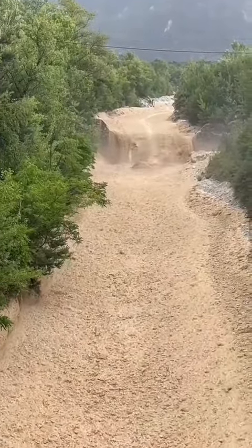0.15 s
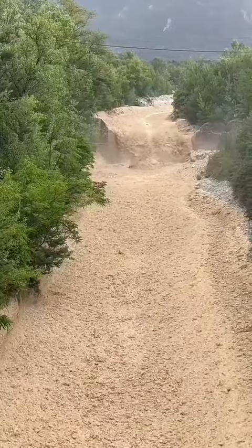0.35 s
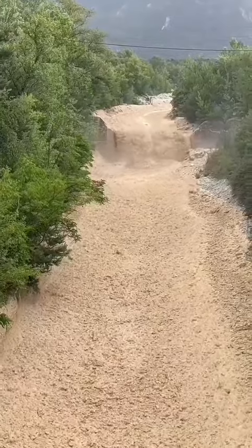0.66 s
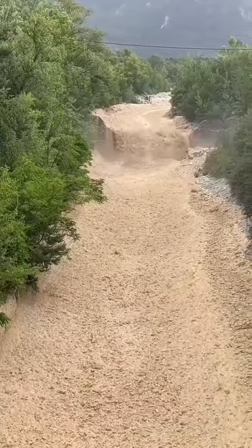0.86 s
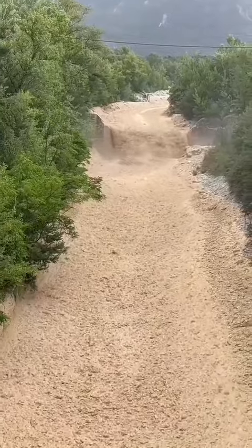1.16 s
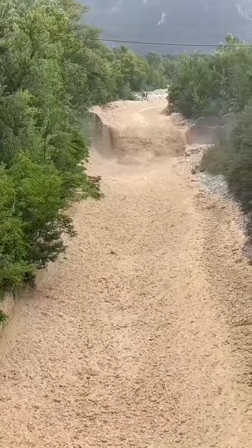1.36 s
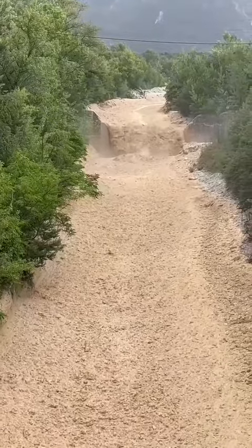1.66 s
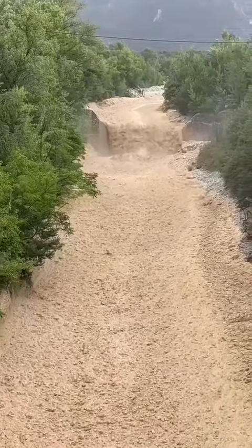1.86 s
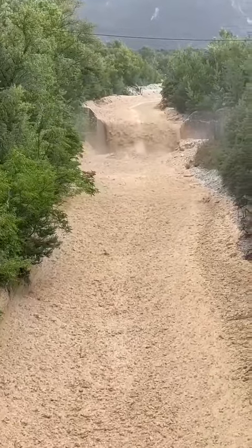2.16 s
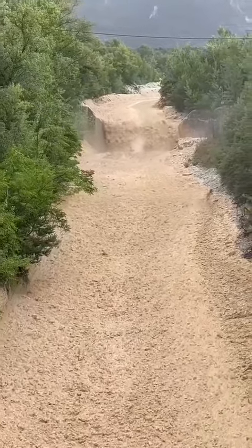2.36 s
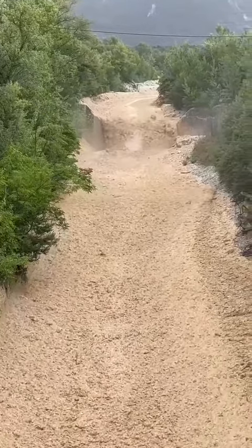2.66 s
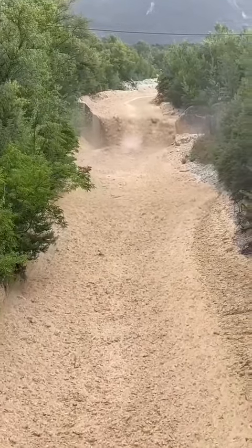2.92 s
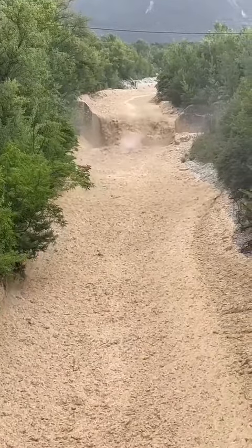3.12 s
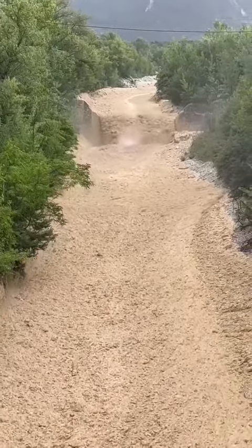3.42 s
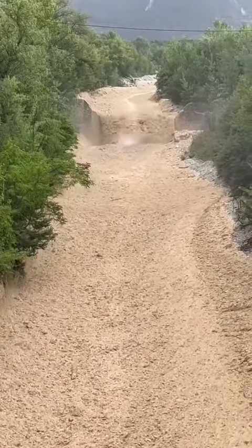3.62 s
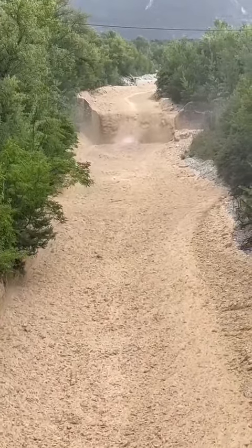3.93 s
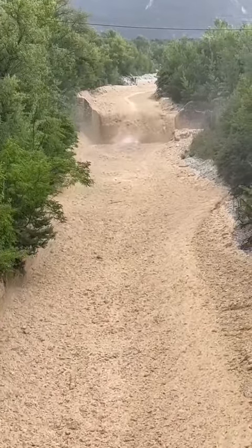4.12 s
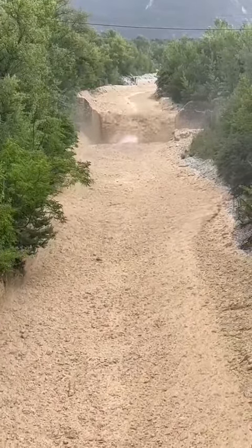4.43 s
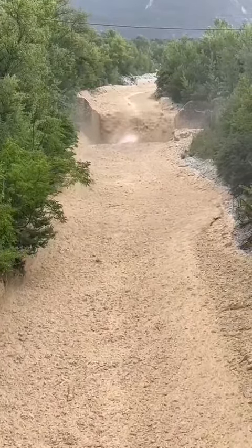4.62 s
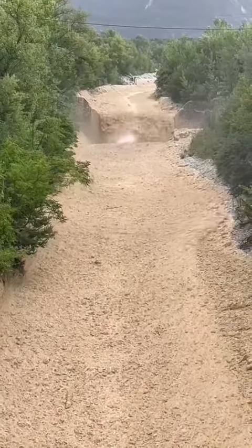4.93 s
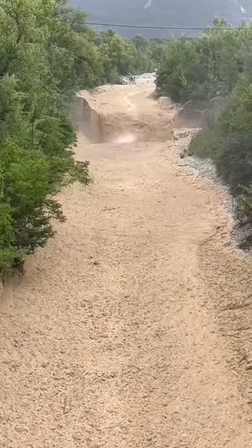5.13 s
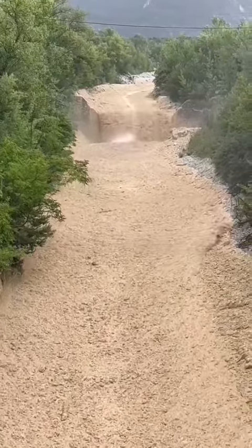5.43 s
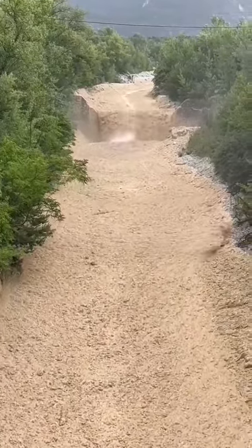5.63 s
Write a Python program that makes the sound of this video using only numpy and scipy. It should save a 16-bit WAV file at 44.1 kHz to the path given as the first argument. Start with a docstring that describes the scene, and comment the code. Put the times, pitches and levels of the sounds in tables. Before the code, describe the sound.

A heavy, dark flood rush holds nearly constant for six seconds, its bass fluttering as boulders grind beneath slurry. Gurgles and a quiet spray hiss ride on top. Around four seconds, a low knock lands with wind buffeting the microphone. Then mud slaps the near bank, droplets patter, and stones roll past with a rising rumble just after five seconds. Open air, no obvious reverberation.

```python
"""A low rumble and churn under wash and hiss: mud pours over a weir and down a mountain channel.
Filtered noise makes bed rumble, slurry and spray; ringing grains make cobbles, plops and patter.
A swell lifts the surface and brings in the near bank, with slaps (noise and rising sines) and splashes.
One dry tick (a decaying step), wind puffs (band noise), boulder thumps (short sines) and a
rolling mass of stones (a noisy tone climbing in pitch) come on top."""
import sys
import numpy as np
from scipy import signal
from scipy.fft import rfft, irfft, next_fast_len
from scipy.io import wavfile
from scipy.ndimage import uniform_filter1d

SR = 44100
rng = np.random.default_rng(int(sys.argv[2]) if len(sys.argv) > 2 else 0)


def log_audio(samples):
    """Write samples as a 16-bit WAV file to the path given in sys.argv[1]."""
    # one column per channel
    frames = np.atleast_2d(samples).T
    # limit to full scale, then quantise
    limited = np.clip(frames, -1, 1)
    pcm = np.round(limited * 32767).astype(np.int16)
    wavfile.write(sys.argv[1], SR, pcm)


N = 254898
TIME = np.arange(N) / SR


def from_db(db):
    """Decibels to amplitude gain."""
    return 10 ** (np.asarray(db) / 20)


def rms_one(x):
    """Scale so that the mean of the channels has rms 1."""
    mid = np.atleast_2d(x).mean(axis=0)
    return x / np.sqrt(np.mean(mid ** 2) + 1e-20)


def in_time(rows):
    """Interpolate each column of a t/s curve at every sample."""
    s, *columns = np.transpose(rows)
    return [np.interp(TIME, s, column) for column in columns]


def at_hz(points, hz):
    """Read a spectrum on a log-frequency axis."""
    known_hz, values = np.transpose(points)
    return np.interp(np.log(np.maximum(hz, 1)), np.log(known_hz), values)


def drift(rate_hz):
    """Two-pole low-passed noise of rms 1, changing about rate_hz times a second."""
    step = 40  # computed at SR / step, then interpolated
    settle = 2000
    r = np.exp(-2 * np.pi * rate_hz * step / SR)
    noise = rng.standard_normal(N // step + 2 + settle)
    slow = signal.lfilter([1], [1, -2 * r, r * r], noise)[settle:]
    return np.interp(np.arange(N) / step, np.arange(len(slow)), rms_one(slow))


def ring(clicks, hz, cycles):
    """Two-pole resonator: a unit click rings as a sine of height 1, down 60 dB after the given cycles."""
    w = 2 * np.pi * hz / SR
    r = np.exp(-np.log(1000) * hz / (cycles * SR))
    return signal.lfilter([0, np.sin(w)], [1, -2 * r * np.cos(w), r * r], clicks + 1e-18)


def burst(start_s, length_s):
    """Envelope that rises to 1 at half of length_s, then dies away."""
    age = np.maximum(TIME - start_s, 0) / (length_s / 2)
    return age * np.exp(1 - np.minimum(age, 50))


# stereo width: f/Hz, side minus mid/dB
WIDTH = [(60, -68), (110, -84), (200, -43), (300, -16), (420, -15), (620, -10.5), (1300, -9), (2400, -13.5),
         (4400, -9.5), (6500, -6), (8500, -2), (15000, 0.5)]


def coloured(pair, spectrum):
    """Filter two unrelated signals, as mid and side, into stereo: narrow bass, wide treble."""
    size = next_fast_len(N)
    hz = np.arange(size // 2 + 1) * SR / size
    mid, side = rfft(pair, size) * from_db(at_hz(spectrum, hz))
    side = side * from_db(at_hz(WIDTH, hz))
    return rms_one(irfft(np.array([mid + side, mid - side]), size)[:, :N])


def turbulence(spectrum, flutter_db, flutter_hz):
    """Countless small eddies and collisions merge into an irregularly fluttering noise."""
    flutter = from_db(flutter_db * drift(flutter_hz))
    return coloured(rng.standard_normal((2, N)) * flutter, spectrum)


def steady(x, window_s):
    """A broad flow keeps its strength: divide by the moving rms to even out slow swings."""
    power = uniform_filter1d(x.mean(axis=0) ** 2, max(int(window_s * SR), 2))
    return x / np.sqrt(np.maximum(power, 1e-6))


def grains(per_s, low_hz, high_hz, cycles, spread_db, clump_db, count=24):
    """Clumps of small impacts, dealt at random to count resonant pitches; two signals of unrelated sign."""
    chance = per_s * from_db(clump_db * drift(9)) / SR
    born = np.flatnonzero(rng.random(N) < chance)
    sizes = from_db(spread_db * np.minimum(rng.exponential(1, len(born)), 4))
    signs = rng.choice([-1, 1], (2, len(born)))
    dealt = rng.integers(0, count, len(born))
    out = np.zeros((2, N))
    for k, hz in enumerate(np.geomspace(low_hz, high_hz, count)):
        clicks = np.zeros((2, N))
        clicks[:, born] = signs * sizes * (dealt == k)
        out += np.sqrt(hz) * ring(clicks, hz, cycles)
    return out


def patchy(pair, low_hz, high_hz, patch_db, patch_hz, count=10):
    """Eddies of different sizes come and go: each of count log-spaced bands swells on its own."""
    size = next_fast_len(N)
    hz = np.maximum(np.arange(size // 2 + 1) * SR / size, 1)
    register = np.clip(np.log(hz / low_hz) / np.log(high_hz / low_hz), 0, 1) * (count - 1)
    whole = rfft(pair, size)
    out = 0
    for k in range(count):
        weight = np.maximum(1 - abs(register - k), 0)
        band = irfft(whole * weight, size)[:, :N]
        out = out + band * from_db(patch_db * drift(patch_hz))
    return rms_one(out)


# boulders grinding along the bed: t/s, deepest rumble level/dB, upper rumble level/dB
RUMBLE_LEVEL = [(0, -22.5, -25.5), (0.3, -21.5, -23.5), (0.75, -20.5, -23.5), (1.1, -22.5, -19.5),
                (1.35, -24.5, -23.0), (1.6, -23.0, -24.5), (1.9, -23.0, -25.0), (2.35, -20.5, -20.0),
                (2.75, -25.5, -23.0), (3.1, -23.0, -21.0), (3.4, -24.5, -21.0), (3.7, -24.5, -22.0),
                (4.0, -24.5, -21.0), (4.3, -25.5, -24.0), (4.65, -21.0, -23.5), (5.1, -22.5, -21),
                (5.5, -25.0, -25.5), (5.78, -23.0, -20.5)]
# colours, deepest first: f/Hz, relative level/dB per Hz
DEEP_COLOUR = [(20, -40), (30, -31), (40, 8), (50, 5), (60, 17), (70, 5), (88, -6), (130, -78)]
RUMBLE_COLOUR = [(45, -44), (66, -6), (78, 3), (110, -1.5), (135, -13.5), (180, -22.5), (400, -81)]
CHURN_COLOUR = [(60, -46), (100, 1.5), (135, 2), (200, -1.5), (280, -5), (340, -11), (480, -29),
                (1200, -77)]
COBBLE_COLOUR = [(150, 3), (260, -4), (340, 1.5), (450, 1.5), (540, 0), (640, -5), (780, -12),
                 (1100, -16.5), (3000, -59)]


def bed_load(churn_db, cobbles_db):
    """Boulders grind along the bed, slurry churns above them, cobbles knock dully inside it."""
    deep_db, rumble_db = in_time(RUMBLE_LEVEL)
    deep = steady(turbulence(DEEP_COLOUR, flutter_db=4.5, flutter_hz=7), window_s=0.17)
    rumble = steady(turbulence(RUMBLE_COLOUR, flutter_db=-1.0, flutter_hz=8.3), window_s=0.15)
    churn = steady(turbulence(CHURN_COLOUR, flutter_db=3.0, flutter_hz=3.9), window_s=0.092)
    knocks = grains(per_s=800, low_hz=262.5, high_hz=855, cycles=20.0, spread_db=2.0, clump_db=0.5)
    knocks = coloured(knocks, COBBLE_COLOUR)
    grinding = from_db(-3.0) * turbulence(COBBLE_COLOUR, flutter_db=0.4, flutter_hz=150)
    cobbles = patchy(knocks + grinding, low_hz=260, high_hz=850, patch_db=1.4, patch_hz=5, count=7)
    cobbles = steady(cobbles, window_s=0.21)
    bed = from_db(deep_db) * deep + from_db(rumble_db) * rumble
    return bed + from_db(churn_db) * churn + from_db(cobbles_db) * cobbles


# colour: f/Hz, relative level/dB per Hz
WASH_COLOUR = [(450, -14), (720, 3.5), (950, 2), (1250, -0.2), (1650, 0.5), (2100, -3.5), (2600, -8),
               (3500, -9.5), (8000, -40)]


def wash(wash_db):
    """The rough surface folds over and traps air, which plops and gurgles in the thick mud."""
    plops = grains(per_s=240, low_hz=600, high_hz=2800, cycles=30, spread_db=2.0, clump_db=2.0, count=36)
    plops = coloured(plops, WASH_COLOUR)
    rush = turbulence(WASH_COLOUR, flutter_db=-0.1, flutter_hz=22)
    gurgle = patchy(rush + from_db(-6.5) * plops, low_hz=600, high_hz=2760, patch_db=1.6, patch_hz=6.0)
    return from_db(wash_db) * steady(gurgle, window_s=0.21)


# thrown spray landing on the stones: t/s, level/dB, length/s
SPLASHES = [(1.478, -46, .018), (3.57, -41, .03), (3.638, -41, .018), (4.403, -41, .009), (4.835, -37, .02),
            (5.245, -38.5, .045), (5.364, -35.5, .022), (5.563, -31.5, .011), (5.675, -32.5, .04)]
# fine droplets on the bank: t/s, level/dB, length/s
SHOWERS = [(4.66, -49, .08), (4.843, -41, .011), (5.03, -47, .1), (5.25, -47.5, .09), (5.366, -46, .012),
           (5.43, -48, .1), (5.565, -40.5, .01), (5.68, -40.5, .045)]
# colours: f/Hz, relative level/dB per Hz
FAR_SPRAY_COLOUR = [(1500, 0), (2400, 3), (3100, 2), (4400, 4), (5300, 2.2), (6300, -6.5), (9200, -5.5),
                    (10400, -13.5), (14300, -13.8), (15200, -58)]
BANK_SPRAY_COLOUR = [(1200, -19), (2400, 3.5), (3500, 1.5), (5300, 2.5), (6300, -4), (9200, -4.5),
                     (10400, -8.5), (14300, -9.5), (15200, -48)]
SPLASH_COLOUR = [(500, -7), (900, 13), (1600, 13.5), (2600, 10), (5200, 8), (6500, -0.5), (14300, -15),
                 (15200, -48)]
DROPLET_COLOUR = [(2000, -18), (4500, 2), (5400, 2), (7000, 0), (9200, -1), (10500, -6), (14300, -6.5),
                  (15200, -40)]


def spray(spray_db, near):
    """The far weir hisses, drops and gravel patter on the near bank; near is the bank's power share."""
    far_hiss = turbulence(FAR_SPRAY_COLOUR, flutter_db=0.7, flutter_hz=25)
    patter = grains(per_s=2300, low_hz=1780, high_hz=14400, cycles=9.3, spread_db=0.0, clump_db=1.5)
    patter = coloured(patter, BANK_SPRAY_COLOUR)
    bank_hiss = turbulence(BANK_SPRAY_COLOUR, flutter_db=1.0, flutter_hz=22)
    bank = rms_one(bank_hiss + from_db(9.5) * patter)
    bank = patchy(bank, low_hz=2000, high_hz=13000, patch_db=1.3, patch_hz=14, count=7)
    thrown = sum(from_db(level_db) * burst(s, length_s) for s, level_db, length_s in SPLASHES)
    splashes = thrown * turbulence(SPLASH_COLOUR, flutter_db=1.2, flutter_hz=190)
    falling = sum(from_db(level_db) * burst(s, length_s) for s, level_db, length_s in SHOWERS)
    showers = falling * turbulence(DROPLET_COLOUR, flutter_db=1.5, flutter_hz=250)
    flow = np.sqrt(1 - near) * far_hiss + np.sqrt(near) * bank
    return from_db(spray_db) * flow + splashes + showers


# debris rolling past: t/s, Gaussian width/s, slurry gain/dB, cobble gain/dB, wash gain/dB
SURGES = [(0.54, 0.12, 1, 3, 0.5), (1.222, .03, -0.5, 0.5, 1), (1.756, .12, 0.7, 0.5, -1),
          (2.045, 0.078, 3, 1, 1), (2.3, .07, 0, 2, 0.5), (2.96, .04, 1, -1, 1.5),
          (3.284, 0.065, 2.5, -0.5, -0.5), (3.88, 0.03, 2.5, 1.8, 0.5), (4.514, 0.077, 1.5, 1.5, 1.5),
          (4.855, 0.026, 3, 5.5, 1), (5.056, 0.032, -3, 2.5, 1.5), (5.26, 0.017, 0.5, 0.5, 1),
          (5.686, 0.025, 4, 2, 2)]


def surges():
    """Each surge swells and ebbs as a Gaussian; dB gains of slurry, cobbles and wash."""
    return sum(np.outer(gains_db, np.exp(-.5 * ((TIME - s) / width_s) ** 2))
               for s, width_s, *gains_db in SURGES)


# mud slapping on the bank: t/s, level before muffling/dB, initial f of the trapped air/Hz, length/s
SLAPS = [(1.200, -35, 1200, .024), (3.576, -31, 910, .012), (4.241, -29, 1050, .014),
         (4.402, -31.5, 1900, .008), (4.430, -24.5, 1400, .007), (4.476, -30.5, 780, .014),
         (4.522, -25.5, 1450, .004), (4.608, -30, 1400, .007), (4.676, -26.5, 1500, .006),
         (4.811, -28, 850, .007), (4.838, -31.5, 1050, .014), (5.233, -26.5, 2350, .006),
         (5.246, -31, 1000, .02), (5.365, -24, 900, .006), (5.533, -28, 1530, .007),
         (5.688, -29, 1400, .01)]


def slaps(cycles, bubble_db, rise_per_s, side_db, dull_hz):
    """Each slap is a brief spatter around a pocket of air, whose note rises as it surfaces."""
    out = np.zeros((2, N))
    for s, level_db, hz, length_s in SLAPS:
        mid, side = np.diff(ring(rng.standard_normal((2, N + 1)), hz, cycles))
        side = side * from_db(side_db)
        spatter = rms_one(np.array([mid + side, mid - side]))
        age = TIME - s
        bubble = from_db(bubble_db) * np.sin(2 * np.pi * hz * age * (1 + rise_per_s * age / 2))
        out += from_db(level_db) * burst(s, length_s) * rms_one(spatter + bubble)
    # thick mud softens the contact
    return signal.sosfilt(signal.butter(2, dull_hz, fs=SR, output="sos"), out)


def scattered(x, echo_db, seconds, count=14):
    """Rocks and bushes on the banks throw back faint echoes that blur each contact."""
    out = x.copy()
    for channel in range(2):
        lags_s = rng.uniform(seconds / 10, seconds, count)
        signs = rng.choice([-1, 1], count)
        for lag_s, sign in zip(lags_s, signs):
            delay = max(int(lag_s * SR), 1)
            gain = sign * from_db(echo_db) * np.exp(-lag_s / seconds)
            out[channel, delay:] += gain * x[channel, :-delay]
    return out


def tick(start_s, level_db, decay_s):
    """A lone dry tick: a sudden negative step that relaxes exponentially."""
    return -from_db(level_db) * (TIME >= start_s) * np.exp(-abs(TIME - start_s) / decay_s)


# wind puffs: t/s, level/dB, Gaussian width/s
PUFFS = [(2.717, -27, 0.037), (2.97, -30, 0.11), (3.76, -28.5, 0.056), (3.894, -21, 0.04),
         (4.48, -32, 0.016)]


def wind(low_hz, high_hz, own_db):
    """Puffs buffet the microphone ports, partly together and partly each on its own."""
    eddies = rng.standard_normal(N) + from_db(own_db) * rng.standard_normal((2, N))
    band = signal.butter(2, [low_hz, high_hz], "band", fs=SR, output="sos")
    eddies = signal.sosfilt(band, eddies)
    strength = sum(from_db(level_db) * np.exp(-.5 * ((TIME - s) / width_s) ** 2)
                   for s, level_db, width_s in PUFFS)
    return strength * rms_one(eddies)


# boulders striking the bed: t/s, level/dB, f/Hz, length/s
BOULDERS = [(3.872, -14, 127, 0.013), (3.888, -6.5, 165, .012), (3.896, -13.5, 443, 0.0097),
            (3.910, -13, 112, 0.016), (4.246, -22, 390, 0.014), (4.472, -17.5, 444, 0.011),
            (4.519, -25, 420, 0.011), (4.713, -10.5, 60.6, 0.012), (4.846, -25, 410, 0.017),
            (5.022, -5.5, 68, 0.014), (5.110, -9, 112, 0.013), (5.208, -9.5, 90.5, 0.022),
            (5.272, -9.5, 120, 0.013), (5.422, -24, 375, 0.014), (5.659, -24.5, 370, 0.013)]


def boulders():
    """A stone lands with a short dull thump: a sine under a burst envelope."""
    return sum(from_db(level_db) * burst(s, length_s) * np.sin(2 * np.pi * hz * (TIME - s))
               for s, level_db, hz, length_s in BOULDERS)


# stones rolling past: t/s, f/Hz, level/dB
ROLL = [(4.98, 120, -42), (5.04, 150, -23), (5.12, 190, -21.5), (5.165, 225, -17.5), (5.195, 270, -27),
        (5.23, 320, -18.5), (5.26, 480, -25), (5.31, 560, -44)]


def rolling(width_hz):
    """A mass of stones rolls past: a carrier roughened by slow noise climbs in pitch."""
    hz, level_db = in_time(ROLL)
    phase = 2 * np.pi * np.cumsum(hz) / SR
    rumble = drift(width_hz) * np.cos(phase) + drift(width_hz) * np.sin(phase)
    passing = (TIME > ROLL[0][0]) & (TIME < ROLL[-1][0])
    return passing * from_db(level_db) * steady(rumble[None], window_s=0.043)


# swell against the near bank: t/s, level above calm flow/dB
SWELL = [(0.0, 0), (0.3, -3.5), (.8, -1), (1.0, -1.5), (1.55, 0.0), (1.7, 1.5), (1.83, 2.1), (1.95, -1),
         (2.3, -0.5), (2.9, 0.5), (3.3, -1.5), (3.6, 1.5), (3.75, .5), (3.97, 2), (4.32, -0.5), (4.55, 1.5),
         (4.95, 3), (5.25, 4), (5.7, 5)]
# levels in the calm flow
CHURN_DB, COBBLES_DB, WASH_DB, SPRAY_DB = -21.5, -27.5, -36, -44
# dB gained per dB of swell
CHURN_FOLLOWS, COBBLES_FOLLOWS, WASH_FOLLOWS, SPRAY_FOLLOWS = 0.081, 0.18, 0.54, 0.86
# swell at which the bank's share of spray power is 0.4, and gradualness of its rise
BANK_SWELL_DB, BANK_WIDTH_DB = 4.0, 1.5
# random heave of the surface: rms, rate
HEAVE_DB, HEAVE_HZ = 0.22, 11


def scene():
    """The torrent in the open air: swell lifts slurry, cobbles, wash and spray by their own shares."""
    swell_db, = in_time(SWELL)
    churn_surge_db, cobble_surge_db, wash_surge_db = surges()
    heave_db = HEAVE_DB * drift(HEAVE_HZ)
    churn_db = CHURN_DB + CHURN_FOLLOWS * swell_db + churn_surge_db
    cobbles_db = COBBLES_DB + COBBLES_FOLLOWS * swell_db + cobble_surge_db + heave_db
    wash_db = WASH_DB + WASH_FOLLOWS * swell_db + wash_surge_db + heave_db
    spray_db = SPRAY_DB + SPRAY_FOLLOWS * swell_db + heave_db / 2
    # the 1.5 keeps the share below 2/3
    near = 1 / (1.5 + np.exp((BANK_SWELL_DB - swell_db) / BANK_WIDTH_DB))
    flow = bed_load(churn_db, cobbles_db) + wash(wash_db) + spray(spray_db, near)
    bank = slaps(cycles=5, bubble_db=-3, rise_per_s=8, side_db=-14, dull_hz=2800)
    bank = scattered(bank, echo_db=-18, seconds=.05)
    dry_tick = tick(start_s=1.5067, level_db=-15.5, decay_s=0.00089)
    puffs = wind(low_hz=143, high_hz=370, own_db=-9.0)
    return flow + bank + dry_tick + puffs + boulders() + rolling(width_hz=55)


def record(dry):
    """A steep elliptic low-pass cuts the top above 15 kHz."""
    return signal.sosfilt(signal.ellip(10, .1, 80, 15000, fs=SR, output="sos"), dry)


dry = scene()
out = record(dry)
log_audio(out)
```